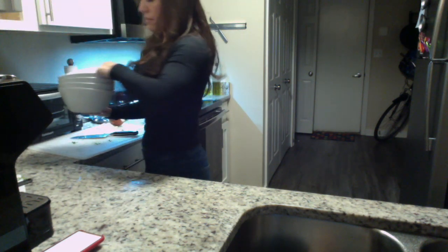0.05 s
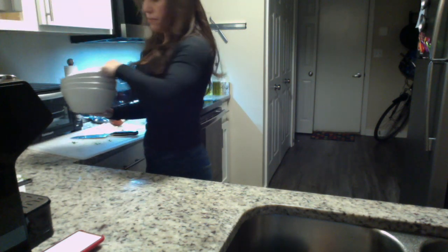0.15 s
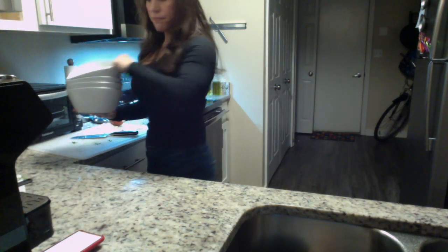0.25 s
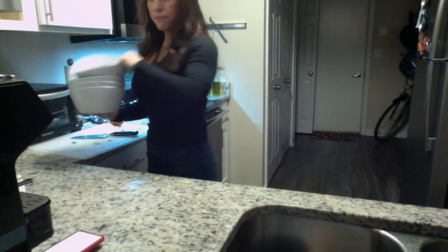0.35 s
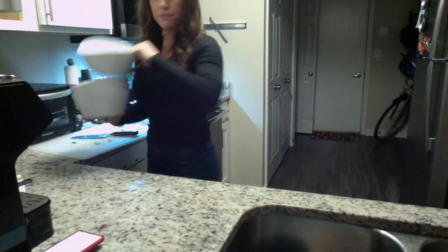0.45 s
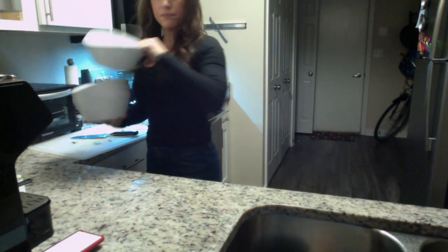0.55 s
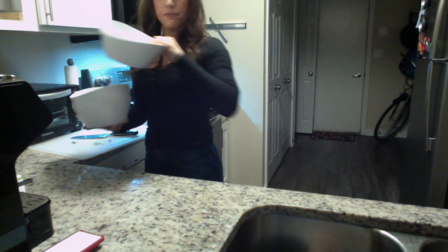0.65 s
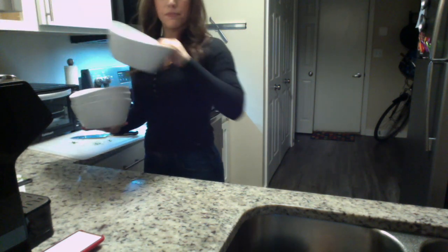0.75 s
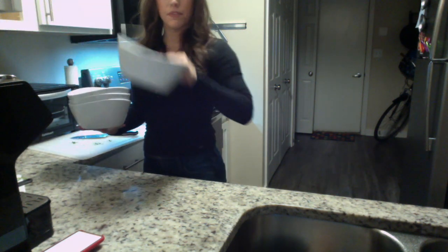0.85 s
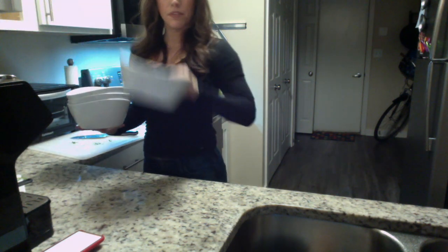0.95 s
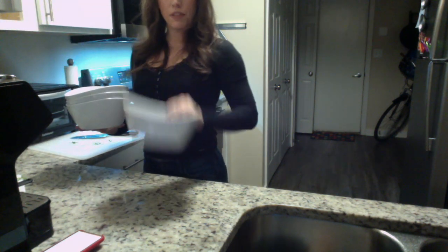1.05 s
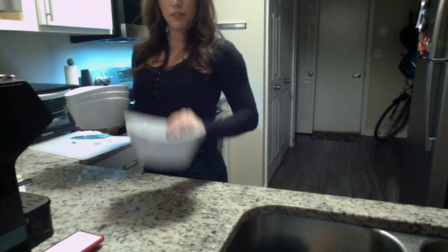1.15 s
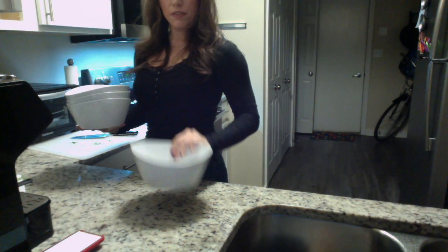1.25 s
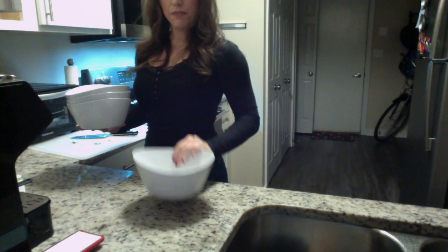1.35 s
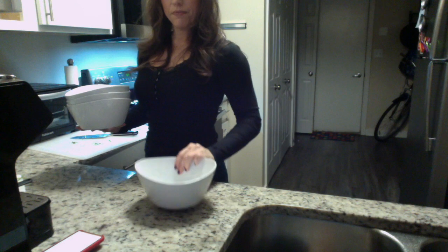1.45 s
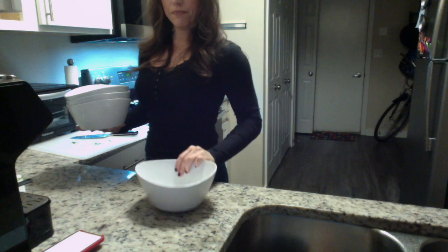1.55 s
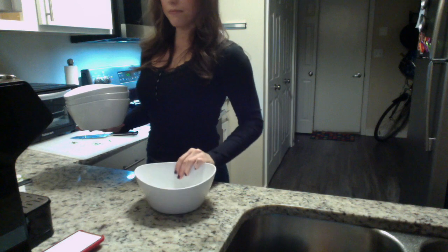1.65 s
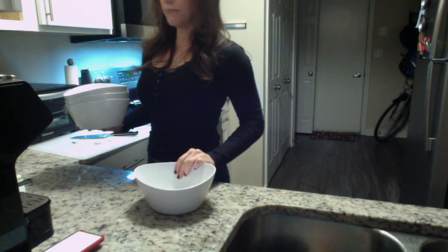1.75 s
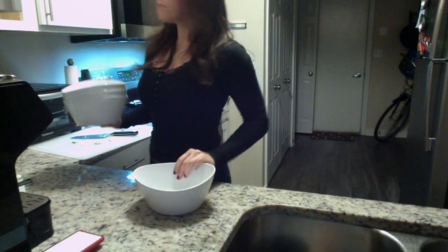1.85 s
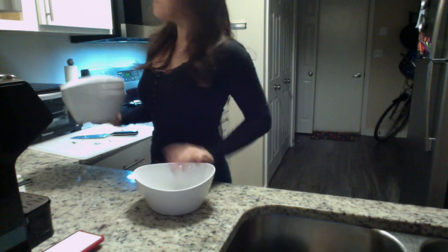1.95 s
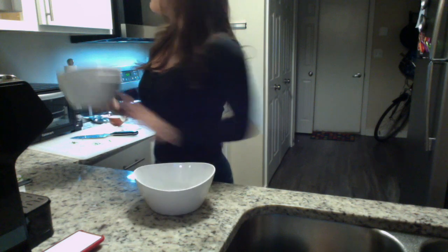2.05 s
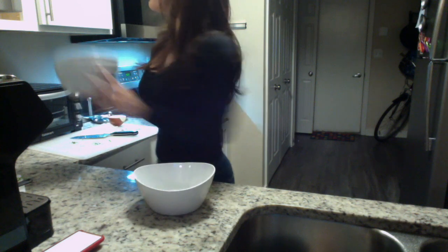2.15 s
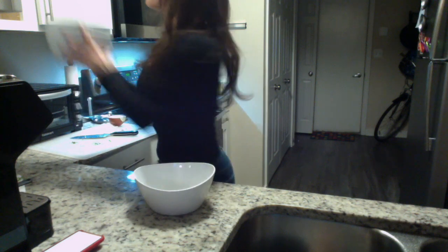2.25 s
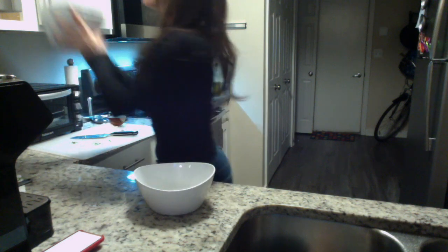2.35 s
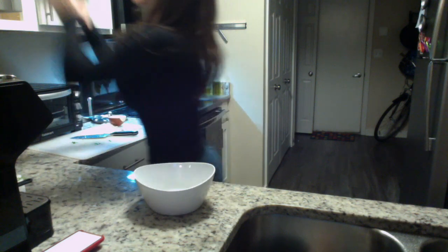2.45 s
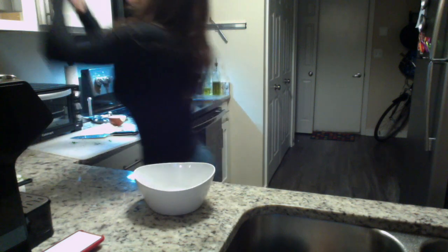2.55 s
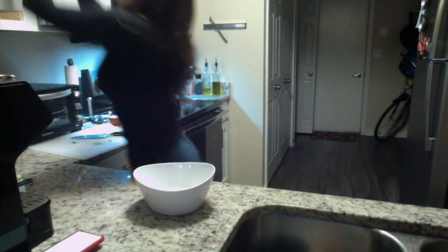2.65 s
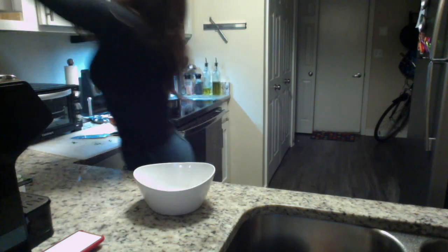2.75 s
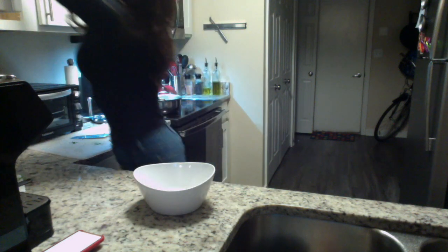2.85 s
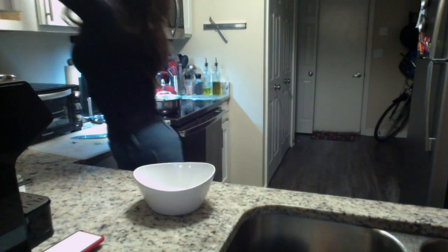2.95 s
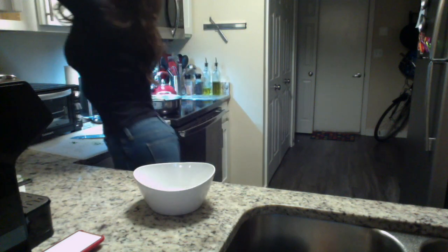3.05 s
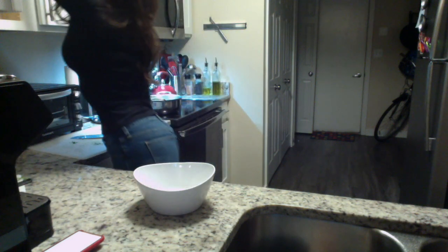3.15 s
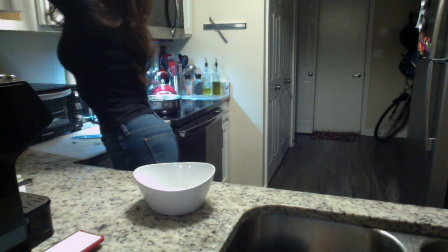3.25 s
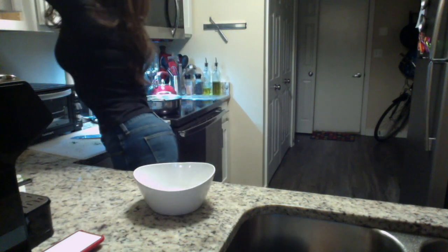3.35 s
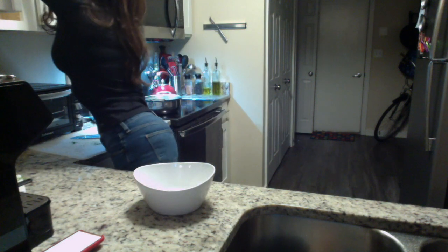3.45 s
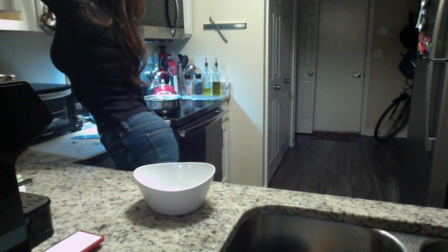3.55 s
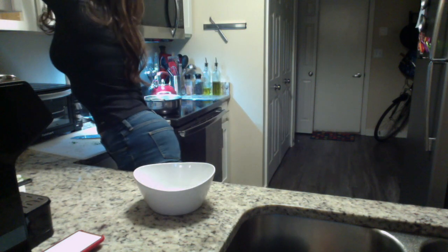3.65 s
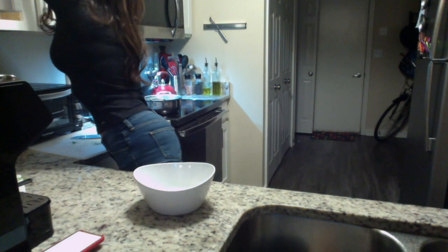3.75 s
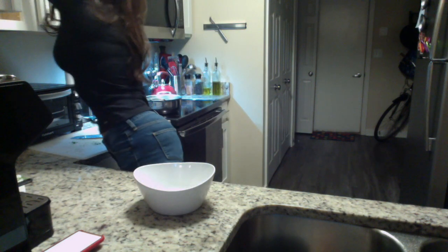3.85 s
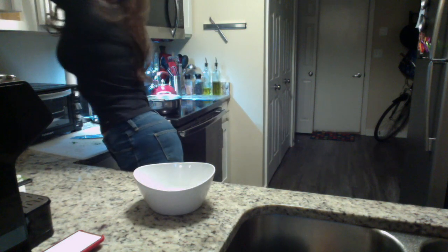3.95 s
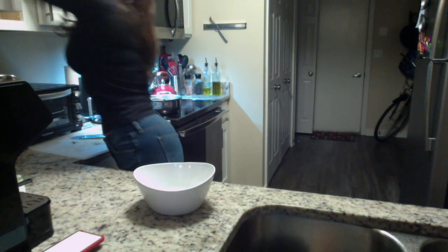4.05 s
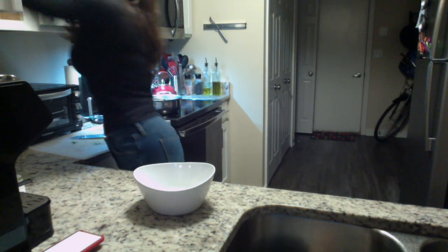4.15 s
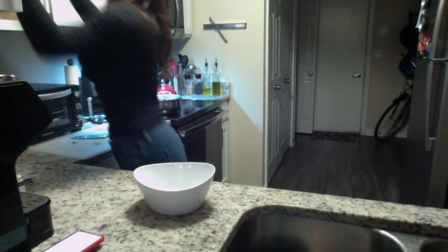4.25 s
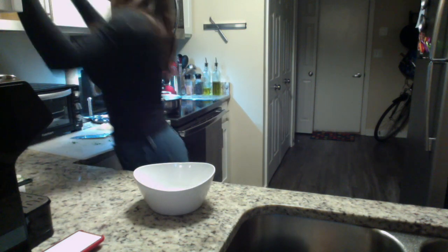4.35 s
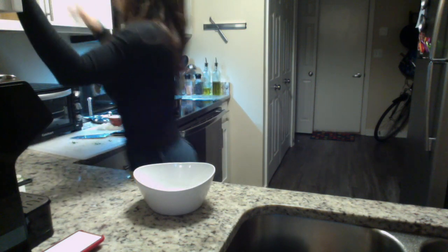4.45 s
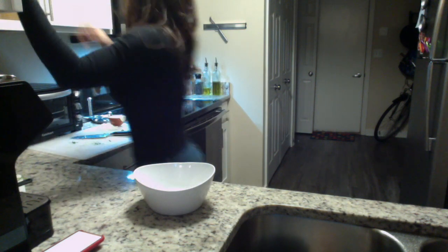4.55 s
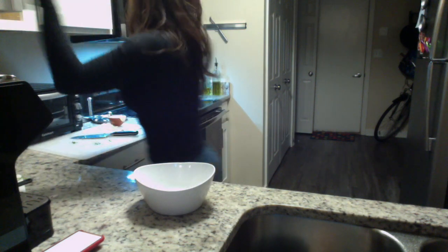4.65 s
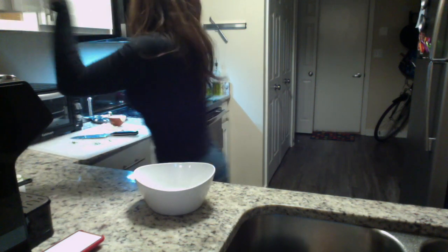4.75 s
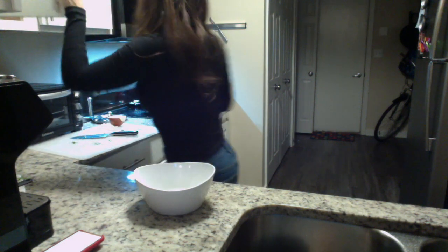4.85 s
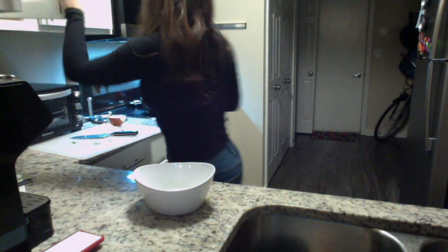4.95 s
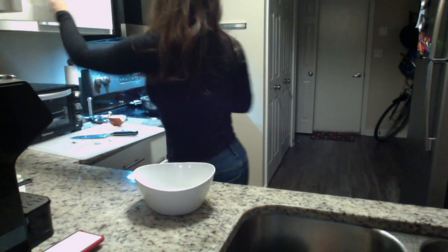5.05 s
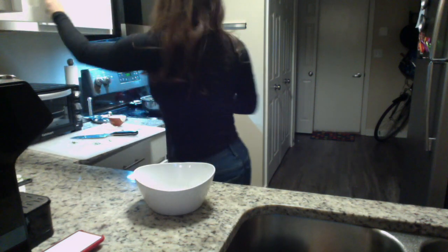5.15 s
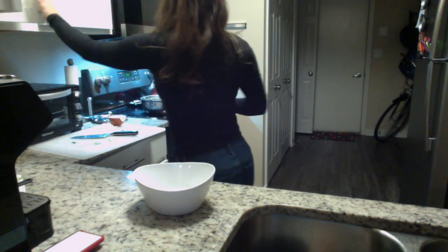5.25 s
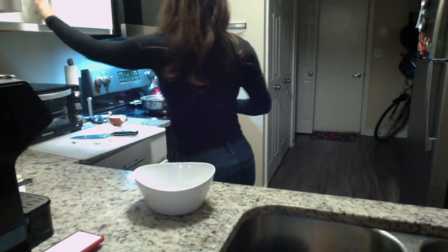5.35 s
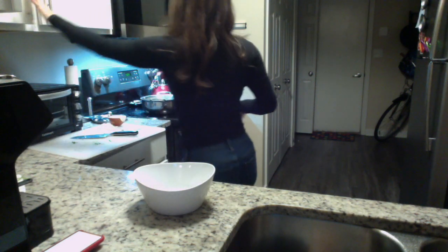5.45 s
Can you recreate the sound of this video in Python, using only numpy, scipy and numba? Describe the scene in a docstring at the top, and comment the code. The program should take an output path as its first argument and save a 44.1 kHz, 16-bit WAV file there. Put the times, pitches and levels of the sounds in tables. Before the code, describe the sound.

In a small, lively kitchen with a faint low ventilation drone, a ceramic bowl rubs and clinks out of a stack, ending in a brief hollow hoot. Two loud knocks follow as it is set on a stone counter. The remaining bowls tap quietly, thud onto a cupboard shelf and grind backwards; clothes rustle, soft steps pass, and a wooden door knocks shut. The microphone is small, thin in the bass, and squashes the peaks.

```python
"""A small, bright kitchen with a low ventilation drone, where every knock rings in the room.
First a ceramic bowl is pulled, clinking, out of a stack, then set down on a stone counter in two hard blows.
The raised stack taps together, lands on a cupboard shelf and is pushed back; last, a wooden door is swung shut.
Knocks are noise bursts with decaying sine modes; rubbing, cloth and drone are coloured noise.
Each source has its own balance of direct and room sound; a limiter at the microphone holds the loudest peaks."""
import sys
import numpy as np
from scipy import signal
from scipy.fft import rfft, irfft
from scipy.io import wavfile
from scipy.ndimage import uniform_filter1d
from numba import njit

SR = 44100
rng = np.random.default_rng(int(sys.argv[2]) if len(sys.argv) > 2 else 0)


def master_out(mix):
    """Clip the mix to full scale and print it as 16-bit PCM to the path in sys.argv[1]."""
    frames = np.transpose(np.atleast_2d(mix))
    ceiling = np.clip(frames, -1, 1)
    pcm = np.round(ceiling * 32767).astype(np.int16)
    wavfile.write(sys.argv[1], SR, pcm)


N = 242435
TIME = np.arange(N) / SR  # whole scene [s]
AGE = np.arange(32768) / SR  # time since a hit [s]

# kitchen reverberation: (frequency [Hz], t60 [s])
ROOM_T60 = [(100, 0.68), (400, 0.45), (1500, 0.4), (4000, 0.4), (8000, 0.28), (14000, 0.16)]
# ventilation drone spectrum: (frequency [Hz], level [dB])
DRONE = [(30, -20), (60, -14.5), (80, -14), (130, 10), (240, 9), (360, 11.5), (440, -21.5), (700, -15),
         (1200, -17), (2200, -29), (4000, -17.5), (8000, -44), (15000, -36)]
DRONE_DB = -67.5
# microphone: limiter ceiling [linear] and upper band edge [Hz]
CEILING, TOP_HZ = .56, 15700

# clothes rustle with pulling, turning, reaching up, turning back: (middle [s], half length [s], level [dB])
MOVES = [(0.059, .55, -63.5), (2.182, 0.44, -69), (3.348, .75, -68), (5.158, 0.76, -74)]
STILL_DB = -77.5  # rustle while standing still
# cloth spectrum: (frequency [Hz], level [dB])
RUSTLE_COLOUR = [(200, 2), (700, 4), (2000, 1), (4000, -7.5), (7000, -14), (10000, -25), (15000, -39)]
# soft steps: (time [s], level [dB])
STEPS = [(4.321, -52.5), (4.382, -72), (4.893, -57), (4.943, -54.5), (4.992, -60)]
# step thud spectrum: (frequency [Hz], level [dB])
STEP_THUD = [(40, -30), (90, -0.5), (140, -1), (260, -10.5), (700, -22), (2000, -38), (6000, -58)]
# short swishes of movement, heard mostly as room sound:
# (time [s], level [dB], low edge [Hz], high edge [Hz])
SWISHES = [(2.47, -38, 3300, 6900), (4.502, -68, 4380, 5750), (4.856, -62.5, 2540, 3800),
           (5.232, -50.5, 1800, 4160), (5.414, -58.5, 2360, 5560)]

# the sprung hinge clicks as the door moves: (time [s], level [dB])
HINGE_CLICKS = [(4.265, -53.5), (4.862, -70.5), (4.902, -70.5)]
# hinge modes: (frequency [Hz], level [dB], t60 [s], cluster spread [Hz])
HINGE_MODES = [(1140, 0.5, 0.079, 35), (1970, 0.5, .06, 40), (2880, -15, 0.03, 48), (3770, -9, 0.059, 37),
               (5050, -9, .07, 56), (5750, -16, 0.046, 60), (7360, -14.5, 0.081, 41)]
# hinge contact spectrum: (frequency [Hz], level [dB])
HINGE_CRACK = [(200, 0), (900, 1.5), (2000, 2), (4000, -7), (7500, -12), (10000, -31), (15000, -38)]
HINGE_RING_DB, HINGE_CONTACT_S = -4.5, .005

# the wooden door is caught and finally shut:
# (time [s], level [dB], tilt [dB per octave], ring [dB], contact [s])
DOOR_KNOCKS = [(4.296, -46.5, 1, 2, 0.0064), (5.441, -39, -4.5, -7, 0.0027),
               (5.451, -33.5, 0.5, 5.5, 0.0054), (5.473, -44, 1.5, -17.5, 0.0012)]
# cabinet box modes: (frequency [Hz], level [dB], t60 [s], cluster spread [Hz])
CABINET_MODES = [(115, -14.5, 0.13, 1.8), (161, -16, 0.3, 6.3), (258, -24, 0.39, 15),
                 (376.4, -16.5, 0.26, 15)]
# door contact spectrum: (frequency [Hz], level [dB])
CABINET_CRACK = [(29, -39), (50, -24), (154, 4.5), (217, -9), (403, -12), (473, -14), (1600, -11),
                 (2470, -26), (4690, -37.5), (12000, -60.5), (15600, -94), (22000, -120)]

# the stack lands on the shelf: (time [s], level [dB], tilt [dB per octave], ring [dB], contact [s])
LANDINGS = [(3.127, -33.5, -5, -14.5, 0.0025), (3.132, -20.5, 2.5, -9, 0.0034),
            (3.360, -31, 5.5, -18, 0.0018)]
# loaded shelf modes: (frequency [Hz], level [dB], t60 [s], cluster spread [Hz])
SHELF_MODES = [(98, -10, 0.47, 10), (255, -6, .45, 5.4), (305, -5.5, .43, 7.2), (799, -5.5, 0.39, 21),
               (1254, -2, 0.098, 45), (2060, -21, 0.35, 28)]
# shelf contact spectrum: (frequency [Hz], level [dB])
SHELF_CRACK = [(29, -44), (50, -27), (98, -15), (180, -12), (280, 1), (518, -10), (778, -3), (1110, -5),
               (1840, -7), (2280, -11), (2600, -14.5), (3400, -19), (6660, -36), (15000, -68.5)]
# the stack is pushed along the shelf in shoves: (start [s], end [s], level [dB])
SHOVES = [(3.275, 3.51, -40.5), (3.344, 3.396, -34.5), (3.527, 3.651, -39.5)]
# grind of the foot on the shelf: (frequency [Hz], level [dB])
PUSH_COLOUR = [(35, -64), (60, -38), (97, -14.5), (264, -9), (296, -10.5), (364, -7.5), (549, -18.5),
               (705, -4.5), (948, -2.5), (1680, -7), (1920, -4), (3040, -12.5), (3560, -11.5), (4300, -20),
               (14000, -53)]
SHOVE_ATTACK_S, SHOVE_RELEASE_S = 0.029, 0.02
# as the slide slows, the foot judders and the shelf sings
JUDDER_START_S, JUDDER_END_S, JUDDER_HZ, JUDDER_DB = 3.6, 3.697, 842, -45.5

# the nested bowls rock against each other as the stack is raised: (time [s], level [dB], ring [dB])
TAPS = [(2.219, -53.5, -5.5), (2.432, -60.5, -6), (2.680, -49.5, -4), (2.798, -55, 1), (2.878, -60.5, 0.5)]
# nested bowls and the air between them: (frequency [Hz], level [dB], t60 [s], cluster spread [Hz])
NESTED_MODES = [(382, -8, 0.1, 26), (1349, 2, 0.058, 54), (2220, -1, 0.065, 48), (3104, -2.5, 0.041, 100),
                (3480, -10, 0.1, 69)]
# tap contact spectrum: (frequency [Hz], level [dB])
TAP_CRACK = [(150, -6.5), (380, 6), (800, -5), (1400, 1.5), (2400, 6), (4000, -7), (6500, -15.5),
             (12000, -31.5)]
TAP_TILT_DB, TAP_CONTACT_S = -1.5, 0.0035

# the lifted bowl drags and catches on the stack: (time [s], level [dB], contact [s])
CLINKS = [(0.0, -55.5, 0.0094), (0.028, -51, 0.015), (0.088, -60, 0.0046), (0.193, -54.5, 0.0022),
          (0.219, -42, .0014), (0.248, -44.5, 0.0034), (0.267, -40, 0.0017), (0.293, -40.5, 0.003),
          (0.313, -44.5, 0.0018), (0.324, -44.5, 0.0022)]
# stacked bowls, modes crowded into clusters: (frequency [Hz], level [dB], t60 [s], cluster spread [Hz])
STACK_MODES = [(1350, -13, .2, 30), (2265, -9, .3, 15), (2790, -7, .2, 35), (3402, 5, .36, 0),
               (3465, -11, .18, 0), (3768, -14, .1, 70), (4740, -4, .17, 25), (5065, -7, .15, 15),
               (6320, -6, .1, 35), (8090, -21, .06, 120), (8980, -18, .06, 180), (10200, -22, .06, 160),
               (11950, -26, .06, 300)]
# glaze on glaze: (frequency [Hz], level [dB])
STACK_CRACK = [(150, -28), (500, 4), (1050, -8), (1500, 9), (2800, 10), (3900, 10), (4400, -4), (5000, 7),
               (6500, -6.5), (7300, -18), (8300, -8), (10300, -16.5), (15000, -31)]
# the pull lasts from the moment the bowl starts to slide until it comes free
PULL_S, FREE_S = .22, .328
# wedged in the stack the bowl is damped; it rings more as it comes free
WEDGED_RING_DB, FREE_RING_DB = -16, 5
# a sharp catch is bright; its tilt [dB per octave] drops with each doubling of the contact time
SHARP_CONTACT_S, SHARP_TILT_DB, DULLING_DB = .0015, 1, 2.5
# glaze rubs on glaze throughout the pull; level ahead of the room
RUB_DB, RUB_ATTACK_S, RUB_RELEASE_S = -43, 0.01, 0.0059
# air between the bowls: its resonance rises and strengthens as the gap opens
GAP_SHUT_HZ, GAP_OPEN_HZ, GAP_SHUT_DB, GAP_OPEN_DB = 568, 659, -39, -24.5
# each catch pumps that air a moment later
PUMP_LAG_S, PUMP_WIDTH_S = .018, 0.0074

# the bowl's foot meets the counter, one edge and then the other:
# (time [s], level [dB], tilt [dB per octave], ring [dB], contact [s])
SET_DOWN = [(1.5083, -15, -1, -9, 0.0022), (1.6935, -14, 2.55, -4.5, 0.0027)]
# single bowl modes: (frequency [Hz], level [dB], t60 [s], cluster spread [Hz])
BOWL_MODES = [(2004, -15, .3, 0), (3220, 0, .46, .5), (5564, -7, .38, 1.5), (5612, -13, .3, 6),
              (7790, -28, .24, 60), (8230, -28, .18, 40), (8690, -27, .18, 40), (9060, -27, .18, 70),
              (9620, -27, .15, 70), (10160, -26, .17, 20), (11950, -38, .13, 50)]
# ceramic on stone: (frequency [Hz], level [dB])
COUNTER_CRACK = [(50, -40), (120, -21), (280, -10), (460, -12), (590, -3), (760, -3), (950, -1), (1250, 2),
                 (1750, -3), (2500, -7.5), (3400, -9), (4600, -20), (6000, -26), (7200, -38), (9500, -30),
                 (15000, -47)]


def undb(db):
    """Decibels to gain."""
    return 10 ** (np.asarray(db) / 20)


def unit(x):
    """Scale to rms 1."""
    return x / np.sqrt(np.mean(x ** 2))


def unit_hit(x):
    """Scale a hit to the energy of 50 ms at rms 1."""
    return x / np.sqrt(np.sum(x ** 2) / (.05 * SR))


def at_hz(points, hz):
    """Read (Hz, value) points on a log-frequency axis."""
    points = np.array(points)
    return np.interp(np.log(hz + 1), np.log(points[:, 0]), points[:, 1])


def through(x, response):
    """Convolve, keeping the length."""
    return signal.fftconvolve(x, response)[:len(x)]


def colour(x, points, tilt_db=0):
    """Minimum-phase filter through (Hz, dB) points, tilted by dB per octave about 1 kHz."""
    size = 4096
    hz = np.fft.rfftfreq(size, 1 / SR)
    octaves = np.log2(np.maximum(hz, points[0][0]) / 1000)
    gain = undb(at_hz(points, hz) + tilt_db * octaves)
    # folding the cepstrum forward makes the filter causal
    cepstrum = irfft(np.log(gain))
    cepstrum[1:size // 2] *= 2
    cepstrum[size // 2 + 1:] = 0
    return through(x, irfft(np.exp(rfft(cepstrum))))


def fade(t60):
    """Exponential decay, 60 dB down after t60 seconds."""
    return np.exp(-np.log(1000) * AGE / max(t60, 1e-3))


def swell(middle_s, half_s):
    """A smooth rise and fall around one moment."""
    return np.exp(-((TIME - middle_s) / half_s) ** 2)


def stroke(start_s, end_s, attack_s, release_s):
    """Envelope of a stroke: builds up to its start, holds, dies away after its end."""
    before = np.maximum(start_s - TIME, 0)
    after = np.maximum(TIME - end_s, 0)
    return np.exp(-before / attack_s - after / release_s)


def add(out, s, x):
    """Mix x in at time s."""
    start = max(int(s * SR), 0)
    out[start:start + len(x)] += x[:max(N - start, 0)]


def kitchen(direct_db, early_db=-3, early_t60=0.048):
    """Path to the microphone: direct sound, quick reflections off counter and cabinets, a diffuse tail."""
    hz = np.fft.rfftfreq(len(AGE), 1 / SR)
    noise = rfft(rng.standard_normal(len(AGE)))
    centres = np.array(ROOM_T60)[:, 0]
    tail = 0
    # overlapping bands, each dying at its own rate
    for (_, t60), share in zip(ROOM_T60, np.eye(len(ROOM_T60))):
        band = at_hz(np.column_stack([centres, share]), hz)
        tail = tail + irfft(noise * band) * fade(t60)
    early = undb(early_db) * rng.standard_normal(len(AGE)) * fade(early_t60)
    path = (tail + early) * (1 - fade(0.004))  # the room answers gradually
    path = path / np.sqrt(np.sum(path ** 2))
    path[0] += undb(direct_db)
    return path


def contact(seconds):
    """Force of a contact: it builds up over the given time, then lets go."""
    u = AGE / max(seconds, 2e-4)
    return u * np.exp(-u)


def burst(points, tilt_db, seconds, path):
    """Contact chatter: a brief spray of noise shaped by the contact force, heard through the room."""
    spray = rng.standard_normal(len(AGE)) * contact(seconds)
    return unit_hit(through(colour(spray, points, tilt_db), path))


def ringing(modes, count=6):
    """Free decay of each mode; an uneven shape splits it into a cluster of close partials."""
    rings = []
    for hz, _, t60, spread_hz in modes:
        partials = hz + spread_hz * rng.standard_normal((count, 1))
        phases = rng.uniform(0, 2 * np.pi, (count, 1))
        cluster = np.sin(2 * np.pi * partials * AGE + phases).sum(axis=0)
        rings.append(unit(cluster * fade(t60)))
    return rings


def blows(events, modes, crack, direct_db, near_db=8):
    """Each blow cracks at the contact and rings the object's modes; its tilt brightens or dulls both."""
    out, rings = np.zeros(N), ringing(modes)
    hz, mode_db = np.transpose(modes)[:2]
    octaves = np.log2(hz / hz[np.argmax(mode_db)])  # counted from the strongest mode
    for s, db, tilt_db, ring_db, seconds in events:
        path = kitchen(direct_db)
        build_up = np.cumsum(contact(seconds))  # the modes gather energy while the contact lasts
        hit = burst(crack, tilt_db, seconds, path)
        gains = undb(ring_db + mode_db + tilt_db * octaves)
        for gain, mode in zip(gains, rings):
            tone = mode * build_up
            # the ring is also heard directly, clear of the room
            hit = hit + gain * unit_hit(through(tone, path) + undb(near_db) * tone)
        add(out, s, undb(db) * hit)
    return out


def friction(points, grain_db, grain_hz):
    """Rubbing: noise whose strength jumps with each slip over the surface."""
    count = N // 10
    slips = np.cumsum(rng.exponential(1 / grain_hz, count))
    strengths = undb(grain_db * rng.standard_normal(count + 1))
    strength = strengths[np.searchsorted(slips, TIME)]
    return unit(colour(rng.standard_normal(N) * strength, points))


def ventilation():
    """Steady low drone: noise coloured towards the low humming bands."""
    return undb(DRONE_DB) * unit(colour(rng.standard_normal(N), DRONE))


def movement(swish_s=0.0062):
    """Steps and swishes are short noise bursts; clothes rustle as friction that swells with each move."""
    cloth = friction(RUSTLE_COLOUR, grain_db=2, grain_hz=120)
    effort = undb(STILL_DB) + sum(undb(db) * swell(s, half_s) for s, half_s, db in MOVES)
    out = through(cloth * effort, kitchen(direct_db=-16.0))
    for s, db in STEPS:
        thud = burst(STEP_THUD, tilt_db=0.5, seconds=0.015, path=kitchen(direct_db=14))
        add(out, s, undb(db) * thud)
    for s, db, low_hz, high_hz in SWISHES:
        band = [(low_hz / 2, -32), (low_hz, 0), (high_hz, -2), (2 * high_hz, -27), (3 * high_hz, -50)]
        swish = burst(band, tilt_db=0, seconds=swish_s, path=kitchen(direct_db=-19.0))
        add(out, s, undb(db) * swish)
    return out


def hinge():
    """The sprung hinge clicks: brief contacts ring its small, quickly damped modes."""
    events = [(s, db, 0, HINGE_RING_DB, HINGE_CONTACT_S) for s, db in HINGE_CLICKS]
    return blows(events, HINGE_MODES, HINGE_CRACK, direct_db=-0.5)


def door():
    """The wooden door knocks on the cabinet and rings the low modes of its box."""
    return blows(DOOR_KNOCKS, CABINET_MODES, CABINET_CRACK, direct_db=-3)


def shelf_landing():
    """The stack lands in the cupboard: each blow rings the loaded shelf, its crack more room than direct."""
    return blows(LANDINGS, SHELF_MODES, SHELF_CRACK, direct_db=-3)


def shelf_slide():
    """The foot of the stack grinds over the shelf in shoves, then judders in a narrow band."""
    grind = friction(PUSH_COLOUR, grain_db=5, grain_hz=400)
    shoves = [undb(db) * stroke(start, end, SHOVE_ATTACK_S, SHOVE_RELEASE_S) for start, end, db in SHOVES]
    grind = grind * np.max(shoves, axis=0)
    band = [(JUDDER_HZ / 2, -35), (JUDDER_HZ * 0.66, -14), (JUDDER_HZ, 0),
            (JUDDER_HZ * 1.74, -12), (JUDDER_HZ * 2, -26), (JUDDER_HZ * 10, -60)]
    judder = friction(band, grain_db=4, grain_hz=200)
    judder = judder * undb(JUDDER_DB) * stroke(JUDDER_START_S, JUDDER_END_S, attack_s=0.035, release_s=0.0084)
    return through(grind + judder, kitchen(direct_db=-20.0))


def nested_taps():
    """Raised bowls tap each other, ringing the damped modes of the nest and the air inside it."""
    events = [(s, db, TAP_TILT_DB, ring_db, TAP_CONTACT_S) for s, db, ring_db in TAPS]
    return blows(events, NESTED_MODES, TAP_CRACK, direct_db=4)


def opening(s):
    """How far the bowl is out of the stack: 0 wedged, 1 free."""
    return np.clip((s - PULL_S) / (FREE_S - PULL_S), 0, 1)


def gap_air(rough=.3, hoot_t60=0.1):
    """Air trapped between the bowls hoots after each catch, rising in pitch as the gap opens."""
    pumping = sum(swell(s + PUMP_LAG_S, PUMP_WIDTH_S) * undb(db) for s, db, _ in CLINKS)
    pumping = pumping / pumping.max()
    # once the bowl is free the hoot dies away by itself
    last_s = CLINKS[-1][0] + PUMP_LAG_S
    pumping = np.maximum(pumping, stroke(last_s, last_s, PUMP_WIDTH_S, hoot_t60 / np.log(1000)))
    gap = opening(TIME)
    hz = GAP_SHUT_HZ + (GAP_OPEN_HZ - GAP_SHUT_HZ) * np.sin(gap * np.pi / 2)
    strength = undb(GAP_SHUT_DB + (GAP_OPEN_DB - GAP_SHUT_DB) * gap)
    flutter = unit(uniform_filter1d(rng.standard_normal(N), size=250))
    hoot = np.sin(2 * np.pi * np.cumsum(hz) / SR)
    tone = pumping * strength * (1 + rough * flutter) * hoot
    # the room leaves the overall level as it was
    return unit(through(tone, kitchen(direct_db=17))) * np.std(tone)


def stack_rub(ring_db=-1):
    """Glaze sticks and slips on glaze; the slips ring the bowls more as the gap opens."""
    rub = friction(STACK_CRACK, grain_db=4, grain_hz=600)
    rub = rub * undb(RUB_DB) * stroke(PULL_S, FREE_S, RUB_ATTACK_S, RUB_RELEASE_S)
    bowls = sum(undb(mode[1]) * ring for mode, ring in zip(STACK_MODES, ringing(STACK_MODES)))
    ring = unit(through(rub * opening(TIME), bowls)) * np.std(rub)
    return through(rub + undb(ring_db) * ring, kitchen(direct_db=5.0))


def catches():
    """Catches of the lifted bowl: the longer the contact the duller, the freer the bowl the more ring."""
    events = []
    for s, db, seconds in CLINKS:
        tilt_db = SHARP_TILT_DB - DULLING_DB * np.log2(seconds / SHARP_CONTACT_S)
        ring_db = WEDGED_RING_DB + (FREE_RING_DB - WEDGED_RING_DB) * opening(s)
        events.append((s, db, tilt_db, ring_db, seconds))
    return blows(events, STACK_MODES, STACK_CRACK, direct_db=9.5)


def bowl_set_down():
    """The bowl's foot strikes the stone counter edge by edge; the hard contact rings the single bowl."""
    return blows(SET_DOWN, BOWL_MODES, COUNTER_CRACK, direct_db=-2.5)


def scene():
    """Bowls, cupboard and the moving person over the drone of the room."""
    pull = catches() + stack_rub() + gap_air()
    counter = bowl_set_down()
    cupboard = nested_taps() + shelf_landing() + shelf_slide() + door() + hinge()
    background = movement() + ventilation()
    return (pull + counter + cupboard + background)[None]


@njit
def follow(size, attack, release):
    """Level follower: quick to rise, slower to fall."""
    out, e = np.empty(len(size)), 0.
    for i in range(len(size)):
        e += (size[i] - e) * (attack if size[i] > e else release)
        out[i] = e
    return out


def record(dry, bass_hz=65, attack_s=.002, release_s=.02):
    """A small microphone without deep bass; a limiter ducks the hardest blows and what slips past saturates."""
    bass_cut = signal.butter(4, bass_hz, "high", fs=SR, output="sos")
    x = signal.sosfilt(bass_cut, dry[0])
    level = follow(np.abs(x), 1 / (attack_s * SR), 1 / (release_s * SR))
    x = x * np.minimum(1, CEILING / (level + 1e-9))
    x = x / (1 + (x / CEILING) ** 6) ** (1 / 6)  # saturation
    top_cut = signal.ellip(8, .2, 70, TOP_HZ, fs=SR, output="sos")
    return signal.sosfilt(top_cut, x)[None]


dry = scene()
out = record(dry)
master_out(out)
```